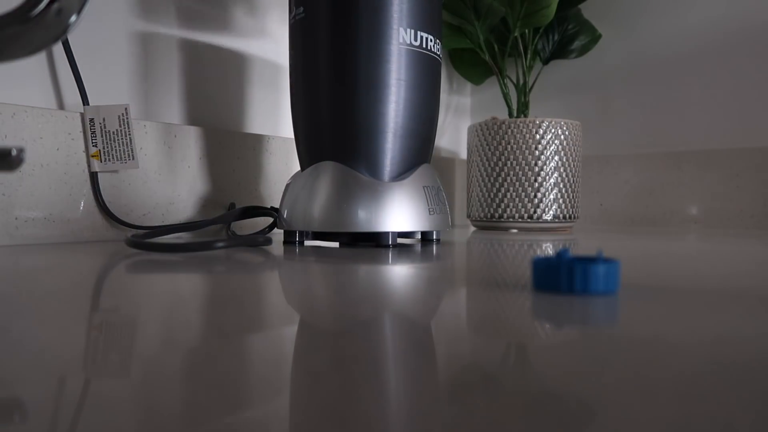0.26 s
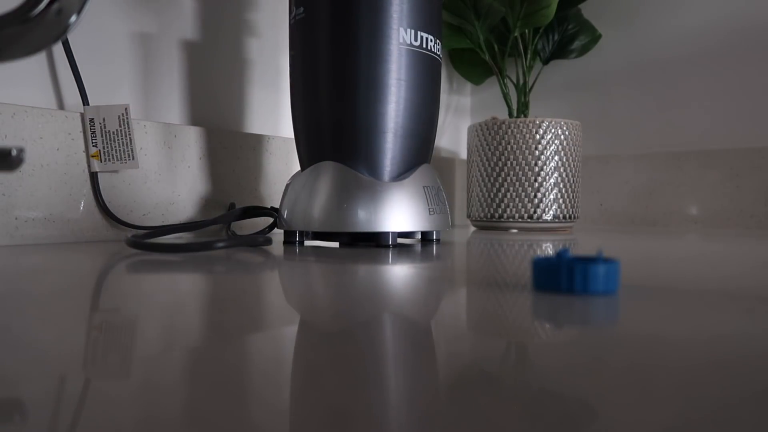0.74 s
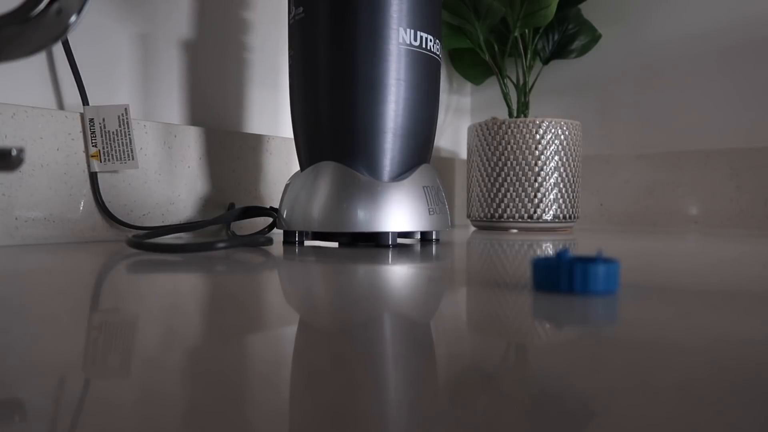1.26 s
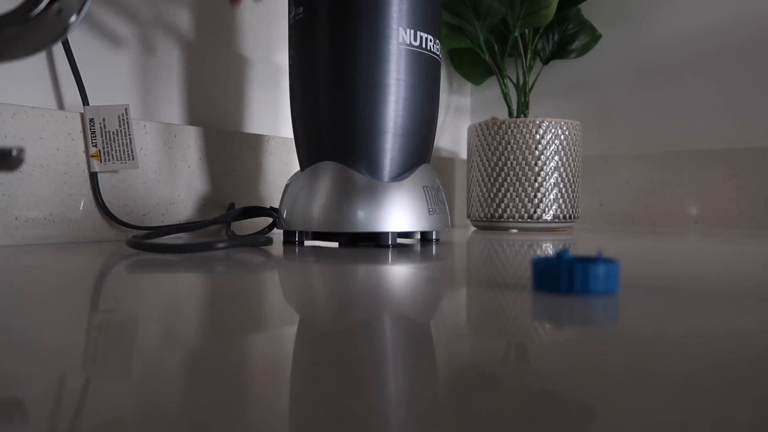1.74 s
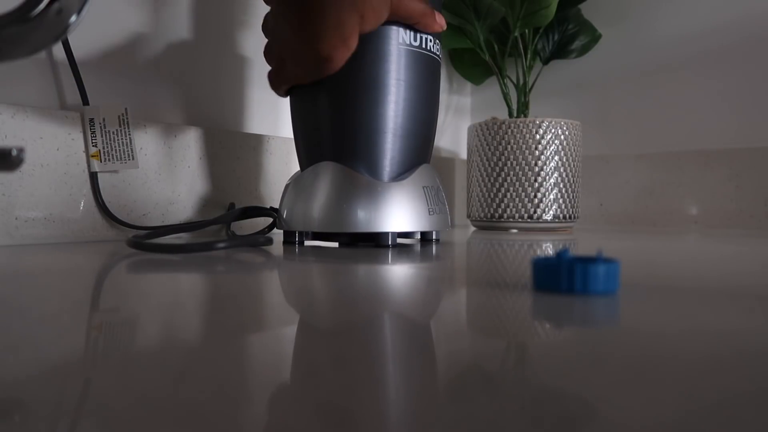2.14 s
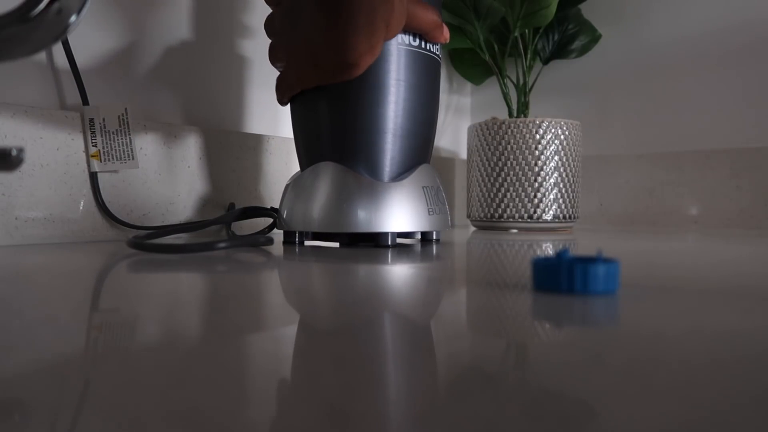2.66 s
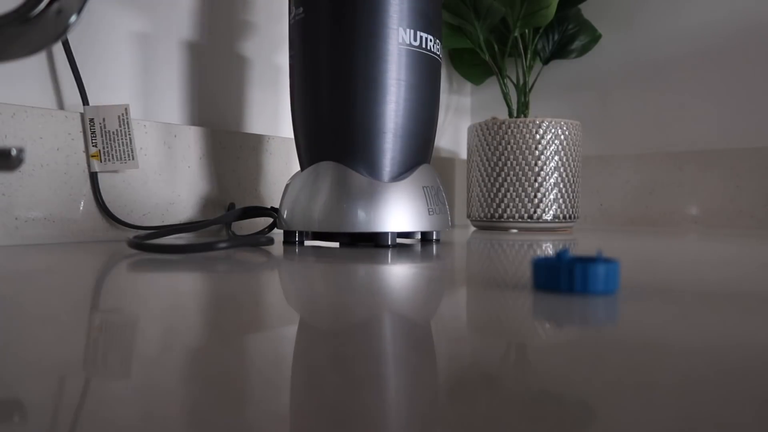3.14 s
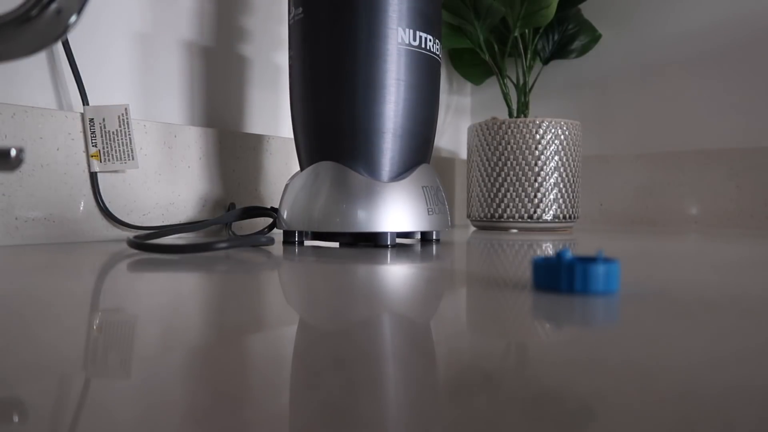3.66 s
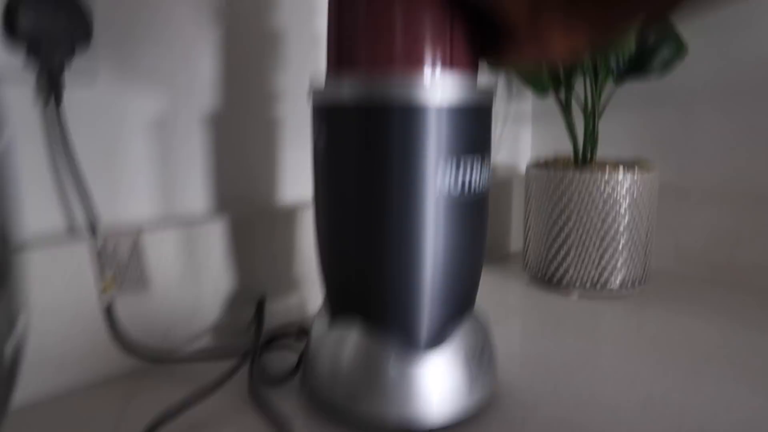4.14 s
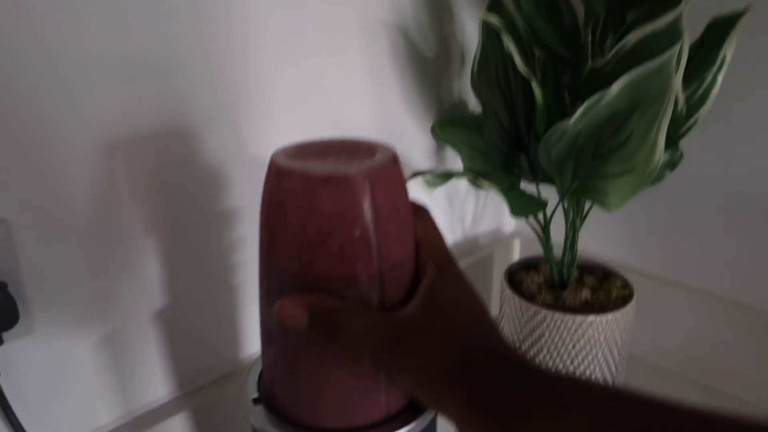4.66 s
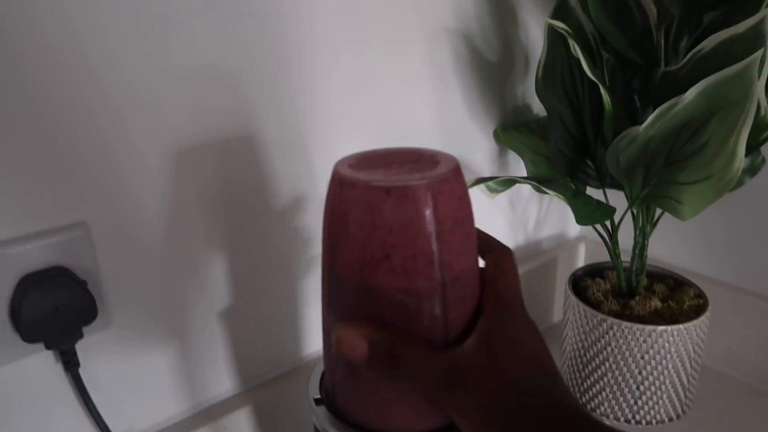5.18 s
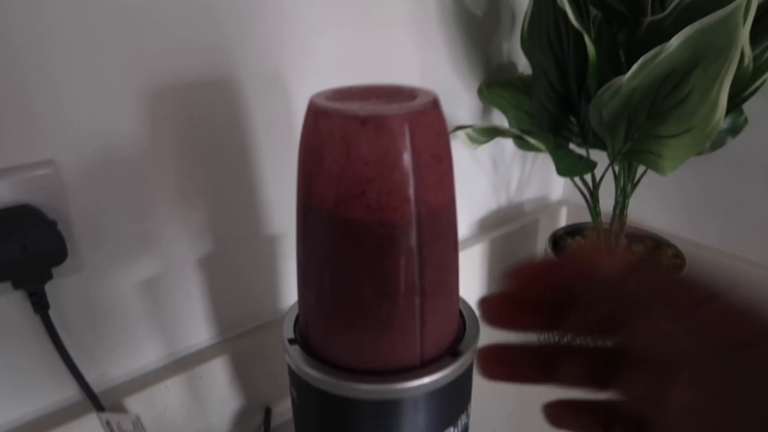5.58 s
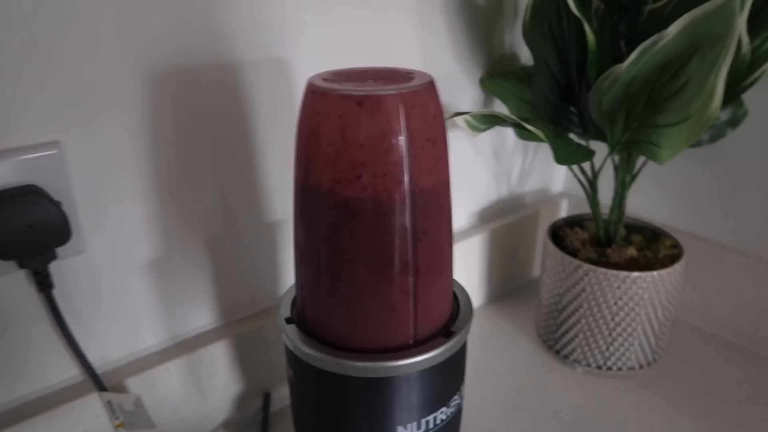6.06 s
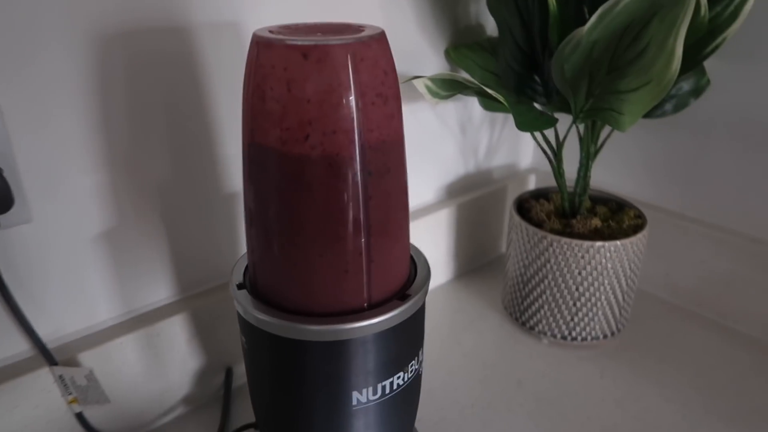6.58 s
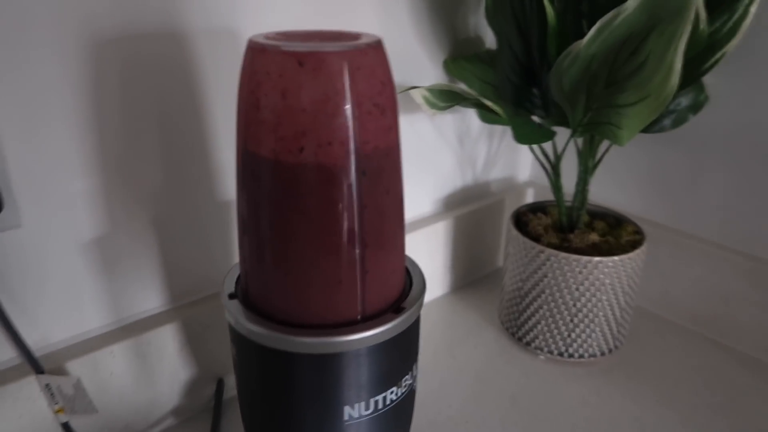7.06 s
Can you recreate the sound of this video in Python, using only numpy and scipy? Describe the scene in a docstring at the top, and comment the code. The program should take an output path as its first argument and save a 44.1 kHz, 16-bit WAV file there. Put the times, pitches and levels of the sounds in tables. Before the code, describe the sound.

A small kitchen is quiet, with soft low rumble and a barely audible high electric whine. At 0.4 seconds a full plastic cup knocks hollowly on a blender base, followed by lighter taps, rattles and rubs until 0.85. Firmer seating clunks come around 1.1 and again at 1.45, with short scrapes and slight room reverberation. Near-quiet follows, with a faint airy rub at 2.0 and small creaks to 2.3. At 2.4 a latch snaps, and at 2.45 the motor jerks on with a loud, slightly clipped crack. It spins up almost instantly into a roar; lumps thump until 2.8. Dense wet churning, hum and breathy high whistles continue. Between 3.8 and 4.3 the close microphone rises from counter to cup; bumps and gulps pass, low hum weakens and the color shifts. From about 6 the roar is steadier, running through the end at 7.3.

```python
"""In a small kitchen with low rumble and a thin whine, a cup of fruit knocks on a blender base and a counter:
impacts are decaying modes and noise, sliding plastic is modulated noise. A faint rub and a snapping latch follow.
Then the motor jerks into motion with a crack; shaft harmonics and mains hum underlie resonant noise of the
churning fruit, whose colour shifts, with gliding whistles, thumps and brief swells.
Halfway through, the listening point rises from the counter to the cup. Peaks are clipped."""
import sys
import numpy as np
from scipy import signal
from scipy.fft import rfft, irfft, next_fast_len
from scipy.io import wavfile
from scipy.ndimage import map_coordinates

SR = 44100
rng = np.random.default_rng(int(sys.argv[2]) if len(sys.argv) > 2 else 0)


def dump_mix(stems):
    """Bounce the given channels to the path in sys.argv[1] as a 16-bit WAV at rate SR."""
    frames = np.atleast_2d(stems).T  # one column per channel
    limited = np.clip(frames, -1, 1)  # hard clip at full scale
    pcm = np.round(limited * 32767).astype(np.int16)
    wavfile.write(sys.argv[1], SR, pcm)


N = 322371
TIME_S = np.arange(N) / SR


def amp(db):
    """Level law: 20 dB is a factor of ten in amplitude."""
    return 10 ** (np.asarray(db) / 20)


def unit(x):
    """Normalization by signal power: scale to rms 1."""
    return x / np.sqrt(np.mean(x ** 2) + 1e-20)


def along(points, hz):
    """Logarithmic frequency scale: interpolate (frequency, value) points along it."""
    point_hz, values = np.transpose(points)
    return np.interp(np.log(hz + 1), np.log(point_hz + 1), values)


def curves(rows):
    """Piecewise-linear control: one value per sample for each column after the time."""
    s, *columns = np.transpose(rows)
    return [np.interp(TIME_S, s, column) for column in columns]


def wobble(rate):
    """Band-limited fluctuation: a smooth random curve with rate knots a second."""
    knots = rng.standard_normal(int(N * rate / SR) + 4)
    return map_coordinates(knots, [np.arange(N) * rate / SR])


def bell(distance, width):
    """Gaussian selectivity: a peak of 1 with the given full width at half height."""
    return np.exp2(-(2 * distance / width) ** 2)


def filtered(x, response):
    """Linear filtering: multiply the spectrum by a response of frequency."""
    size = x.shape[-1]
    m = next_fast_len(size + SR // 2)
    return irfft(rfft(x, m) * response(np.fft.rfftfreq(m, 1 / SR)), m)[..., :size]


def noise(spectrum, size):
    """Spectral shaping: two unrelated coloured noises of rms 1."""
    return unit(filtered(rng.standard_normal((2, size)), lambda hz: amp(along(spectrum, hz))))


# stereo width of the sound field: (frequency [Hz], side gain [dB])
SIDE_GAIN = [(60, -55), (110, -19), (200, -19), (380, -14.5), (690, -25.5), (1280, -18), (2350, -18),
             (4340, -9.5), (8000, -1.5), (14700, 5.5)]


def spread(pair):
    """Interaural decorrelation: mid plus and minus side, nearly mono in the bass, wide in the treble."""
    side = filtered(pair[1], lambda hz: amp(along(SIDE_GAIN, hz)))
    return np.array([pair[0] + side, pair[0] - side])


def add(track, s, sound):
    """Superposition: mix a sound into a track at time s."""
    part = track[..., round(s * SR):][..., :sound.shape[-1]]
    part += sound[..., :part.shape[-1]]


# spectrum of the kitchen's rumble: (frequency [Hz], relative density [dB per Hz])
KITCHEN_RUMBLE = [(25, -23), (40, -4), (62, 5.5), (100, -1.5), (165, -5), (240, -7), (380, -4), (630, -16),
                  (1000, -20), (2000, -25), (4500, -32.5), (8000, -41.5), (13000, -52), (15000, -66)]


def background(floor_db=-45, whine_db=-74, whine_hz=13000):
    """Steady ambience: diffuse low-frequency noise with one pure high tone, a thin electric whine."""
    whine = amp(whine_db) * np.sin(2 * np.pi * whine_hz * TIME_S)
    return spread(amp(floor_db) * noise(KITCHEN_RUMBLE, N)) + whine


def ring(modes, t, attack, vary_db=3.0, detune=0.021):
    """Modal superposition: struck modes with peak 1; level and pitch differ a little at each blow."""
    chance = rng.standard_normal((len(modes), 2))
    x = np.zeros(len(t))
    for (hz, db, t60), (level_chance, pitch_chance) in zip(modes, chance):
        decay = amp(db + vary_db * level_chance - 60 * t / t60)
        x += decay * np.sin(2 * np.pi * hz * (1 + detune * pitch_chance) * t)
    x = x * (1 - np.exp(-t / attack))
    return x / np.abs(x).max()


SOFT_CYCLES = 0.55  # a mode loses 6 dB when the contact rise lasts this many of its cycles


def softened(modes, rise):
    """Impact spectrum: a slow contact hardly reaches the higher modes."""
    return [(hz, db - 20 * np.log10(1 + (hz * rise / SOFT_CYCLES) ** 2), t60) for hz, db, t60 in modes]


# contacts; levels precede the per-source offsets in knocks(): (time [s], cup level [dB],
# motor base level [dB], counter level [dB], click level [dB], rise [s])
CONTACTS = [(0.4202, -10.5, -20, -18, -15.5, 0.0003), (0.4247, -16.5, -30, -36, -26, .0004),
            (.43, -16.5, -20.5, -23, -26, 0.00067), (0.459, -30, -31, -43, -43, 0.0013),
            (.577, -26, -31, -19.5, -21.5, 0.005), (.619, -30, -45, -28.5, -42, 0.0012),
            (.645, -38, -42, -39, -38, .002), (0.747, -20.5, -27.5, -30, -27, 0.0007),
            (0.757, -24, -35, -23, -36, 0.0012), (0.845, -38, -44, -35, -49, 0.00095),
            (.964, -37, -39, -28, -38, 0.0018), (1.024, -40, -29, -29, -22.5, 0.0032),
            (1.052, -35.5, -35, -35, -24, .003), (1.0862, -34, -7.5, -18, -21.5, 0.0005),
            (1.102, -21.5, -9.5, -25, -19.5, 0.002), (1.112, -24, -26, -31, -32, .002),
            (1.139, -37, -11.5, -46, -40, .003), (1.357, -53, -42, -44, -36, .002),
            (1.4541, -24, -14.5, -21, -19, 0.002), (1.461, -17, -19, -16, -13.5, 0.00051),
            (1.4702, -22.5, -13, -19, -16, 0.00055), (1.608, -43.5, -61, -38, -30, 0.0009),
            (2.067, -45, -46, -38, -35, 0.002), (2.227, -34, -32.5, -31, -19, 0.006),
            (2.271, -42, -29.5, -36, -41, .004), (2.4474, -15, -3.5, -36.5, -33, 0.00076),
            (2.468, -35, -9, -38, -38, 0.0018)]
# modes of cup, motor base and counter: (frequency [Hz], relative level [dB], nominal 60 dB decay [s])
CUP_MODES = [(484.4, 6, 0.12), (527.6, 2, 0.19), (577, -8, 0.09), (696, 7.5, 0.06), (806, 9, 0.026),
             (922, 7, 0.031)]
BASE_MODES = [(201, -14, 0.065), (332, -12, 0.085), (365.3, 9.5, 0.092), (420, -4, 0.17)]
COUNTER_MODES = [(65.9, -4, 0.39), (78, -4.5, 0.29), (99, -3, 0.14), (121, -2.5, 0.12), (175, 1.5, 0.09)]
# spectrum of a plastic contact: (frequency [Hz], relative level [dB])
CLICK_SPECTRUM = [(200, -2), (700, 4.5), (1050, -4), (1400, 1.5), (2400, -3), (3800, -8), (7000, -22.5),
                  (11000, -34.5), (15000, -38)]
SEATED_AT_S = 1.2  # the cup drops into its seat
# speed of the ringing, both pitch and decay: base before seating, cup after it
LOOSE_BASE_RATIO, SEATED_CUP_RATIO = 0.93, 1.08


def knocks(cup_db=4, base_db=4, counter_db=2.0, click_db=-2, click_t60=0.032,
           rattle_db=-20, rattle_t60=0.17, grit_db=2.2):
    """Impact excitation: each contact clicks and rings the cup, the heavy base and the counter below."""
    out, t = np.zeros((2, N)), np.arange(SR // 2) / SR
    clicks, rattles = np.zeros((2, N)), np.zeros((2, N))
    for s, cup, base, counter, click, rise in CONTACTS:
        seated = s > SEATED_AT_S
        cup_ratio, base_ratio = (SEATED_CUP_RATIO, 1) if seated else (1, LOOSE_BASE_RATIO)
        cup_ring = ring(softened(CUP_MODES, rise), t * cup_ratio, attack=0.0011, vary_db=3.1, detune=0.011)
        base_ring = ring(BASE_MODES, t * base_ratio, attack=0.002, vary_db=1.6, detune=0.015)
        counter_ring = ring(COUNTER_MODES, t, attack=0.0044, detune=0.08)
        add(out, s, amp(cup + cup_db) * cup_ring)
        add(out, s, amp(base + base_db) * base_ring)
        add(out, s, amp(counter + counter_db) * counter_ring)
        # a hard crack, then the loose plastic parts rattle on
        contact = amp(click + click_db) * (1 - np.exp(-t / rise)) * noise(CLICK_SPECTRUM, len(t))
        add(clicks, s, amp(-60 * t / click_t60) * contact)
        add(rattles, s, amp(rattle_db - 60 * t / rattle_t60) * contact)
    grit = unit(amp(grit_db * wobble(400)))
    return out + spread(clicks + rattles * grit)


# reverberation of the kitchen: (frequency [Hz], 60 dB decay [s])
ROOM_DECAY = [(100, 0.35), (500, 0.4), (3000, 0.36), (12000, 0.2)]


def room(x):
    """Reverberation: convolution with noise whose decay depends on frequency, different at each ear."""
    hz, t, z = signal.stft(rng.standard_normal((2, SR // 2)), SR, nperseg=256)
    decay = amp(-60 * t / along(ROOM_DECAY, hz)[:, None])
    tail = signal.istft(z * decay, SR, nperseg=256)[1]
    tail = tail / np.linalg.norm(tail[0])
    late = np.pad(x.mean(axis=0), (SR // 200, 0))  # the tail lags by 5 ms
    return spread(signal.fftconvolve(late[None], tail, axes=1)[:, :N])


# the cup slides in its seat: (time [s], length [s], groan level [dB], scrape level [dB])
SLIDING_STROKES = [(0.578, 0.14, -35, -49.5), (0.643, 0.046, -38, -59), (0.81, 0.18, -43, -75),
                   (0.953, 0.08, -35.5, -51), (1.08, 0.11, -34, -40), (1.385, 0.047, -38, -41.5),
                   (2.075, 0.32, -48.5, -58), (2.283, 0.13, -40.5, -56)]


def slides(grain_db=3.0, grit_db=3):
    """Stick-slip friction: plastic rubs on plastic in short strokes and makes the cup groan."""
    groan = noise([(60, -31), (165, -1.0), (300, -5.5), (470, -3.5), (540, -5.5), (640, -11.0),
                   (900, -35), (2000, -64)], N)
    scrape = noise([(200, -25), (1000, 5.0), (2400, 1.0), (3300, -4.0), (4500, -5.5),
                    (8000, -19.0), (15000, -31)], N)
    scrape = unit(scrape * amp(grit_db * wobble(900)))
    out = np.zeros((2, N))
    for s, length, groan_db, scrape_db in SLIDING_STROKES:
        stroke = np.exp(-(2 * (TIME_S - s) / length) ** 2)
        out += stroke * (amp(groan_db) * groan + amp(scrape_db) * scrape)
    grain = unit(amp(grain_db * wobble(110)))
    return spread(out * grain)


RUB_AT_S, RUB_LENGTH_S, RUB_DB = 2, 0.15, -62
# resonances of the rub: (frequency [Hz], width [Hz], relative level [dB])
RUB_BANDS = [(2340, 110, -1), (4150, 120, -3), (4580, 120, -8)]


def rub():
    """Friction noise: a short airy swish in narrow bands, as of a hand reaching over the housing."""
    def bands(hz):
        return sum(amp(db) * bell(hz - centre, width) for centre, width, db in RUB_BANDS)

    swish = unit(filtered(rng.standard_normal((2, N)), bands))
    return spread(amp(RUB_DB) * bell(TIME_S - RUB_AT_S, RUB_LENGTH_S) * swish)


# snaps of the latch: (time [s], ring level [dB], snap level [dB])
LATCH_SNAPS = [(2.404, -35.5, -36), (2.409, -15.5, -30), (2.4122, -23, -23.5), (2.4387, -30, -22),
               (2.442, -29, -20)]
# modes of the switch: (frequency [Hz], relative level [dB], 60 dB decay [s])
SWITCH_MODES = [(1970, -1, 0.02), (4530, -1, 0.03), (4780, -7, 0.018), (6300, -3, 0.015),
                (7860, -11, 0.012)]


def latch(snap_t60=0.038):
    """Transient excitation: the cup's tabs snap the switch down with noise bursts and high, short modes."""
    out, t = np.zeros((2, N)), np.arange(SR // 10) / SR
    for s, ring_db, snap_db in LATCH_SNAPS:
        burst = noise([(300, 8), (5000, -4), (9000, -20), (15000, -26)], len(t))
        snap = amp(snap_db - 60 * t / snap_t60) * burst
        add(out, s, amp(ring_db) * ring(SWITCH_MODES, t, attack=0.00027, detune=0.032) + snap)
    return out


START_S = 2.447  # the motor is switched on
# the drive coupling takes up the load: (frequency [Hz], relative density [dB per Hz])
BITE_SPECTRUM = [(120, -25), (300, 5), (800, -2), (1130, -2), (1500, -8), (2000, -1), (2420, 1),
                 (2850, -10), (4100, -20), (6000, -46), (15000, -56)]


def bite(db=-4.0, crack_t60=0.023, grind_db=-13, grind_t60=0.14):
    """Two-stage decay: the first jerk slams the coupling into the blades, which grind into packed fruit."""
    out, t = np.zeros((2, N)), np.arange(SR // 4) / SR
    fade = amp(-60 * t / crack_t60) + amp(grind_db - 60 * t / grind_t60)
    add(out, START_S, amp(db) * fade * noise(BITE_SPECTRUM, len(t)))
    return spread(out)


def running(rise):
    """First-order rise: 0 before the motor starts, then up towards 1 with this time constant [s]."""
    return 1 - np.exp(-np.maximum(TIME_S - START_S, 0) / rise)


# shaft speed under load, before spin-up and jitter: (time [s], speed [turns a second])
SHAFT_SPEED = [(2.85, 170), (3.15, 165), (3.55, 165), (3.75, 160), (3.95, 165), (4.1, 150), (4.32, 180),
               (4.52, 162), (4.75, 167), (5.4, 170.8), (5.65, 169), (5.95, 182), (6.37, 183), (7.17, 166)]


def shaft_turns(spin_up=0.06, jitter=0.0039):
    """Phase accumulation: turns done so far, as the shaft spins up and then wavers."""
    speed, = curves(SHAFT_SPEED)
    return np.cumsum(speed * running(spin_up) * (1 + jitter * wobble(25))) / SR


LIFT_START_S, LIFT_TAKES_S = 3.8, 0.51


def lifted():
    """Source distance: 0 while one listens at the counter, 1 once level with the cup."""
    return np.clip((TIME_S - LIFT_START_S) / LIFT_TAKES_S, 0, 1)


MAINS_HZ = 50
# shaft harmonics: (multiple of the shaft rate, rms level [dB], share of random flutter [0 to 1])
SHAFT_ORDERS = [(1, -38.5, 0.22), (2, -33, 0.52), (3, -47, 0.8), (5, -38, 0.3)]


def motor(turns, hum_db=-39, overtone_db=-48, hum_lift_db=-10, overtone_lift_db=3, waver_db=4.5):
    """Order spectrum: unbalance and blades sound at shaft multiples; field coils hum at twice the mains."""
    out = np.zeros(N)
    for multiple, db, rough in SHAFT_ORDERS:
        flutter = np.sqrt(1 - rough) + np.sqrt(rough / 2) * (wobble(35) + 1j * wobble(35))
        out += amp(db) * np.real(flutter * np.exp(2j * np.pi * multiple * turns))
    field, lift = 2 * np.pi * 2 * MAINS_HZ * TIME_S, lifted()
    # the hum is strongest near the counter
    hum_level = hum_db + lift * (hum_lift_db + waver_db * wobble(3.7))
    overtone_level = overtone_db + lift * overtone_lift_db + waver_db * wobble(3.34)
    out += amp(hum_level) * np.sin(field)
    out += amp(overtone_level) * np.sin(2 * field)
    return np.sqrt(2) * out * running(0.064)


def causal(gain):
    """Minimum phase: fold the cepstrum so that the response rings only after it is struck."""
    cepstrum = irfft(np.log(gain + 1e-6))
    half = len(cepstrum) // 2
    fold = np.concatenate([[1], np.full(half - 1, 2), [1], np.zeros(half - 1)])
    return np.exp(rfft(cepstrum * fold))


# the mix against the cup wall: (frequency [Hz], relative density [dB per Hz])
CHURN_SPECTRUM = [(25, -30), (68, 0.5), (130, -12), (203, 2), (260, -3.5), (320, 4), (600, 7.5),
                  (780, -2.5), (1400, -3), (2800, -3), (4200, -8.5), (6000, -18), (9000, -31.5),
                  (12500, -40), (15000, -54)]


def chop(turns, resonances, chunk_rate, chunk_db, blade_depth, surge_db):
    """Source and filter: turbulence and chunks flung by the blades excite the cup's resonances."""
    chunks = (rng.random(N) < chunk_rate / SR) * rng.uniform(-1.04, 1, (2, N))
    force = rng.standard_normal((2, N)) + amp(chunk_db) * unit(chunks)
    blades = 1 + blade_depth * np.cos(2 * np.pi * 2 * turns)  # two pulses a turn
    force = force * blades * amp(surge_db * wobble(60))

    def wall(hz):
        peaks_db = sum(db * bell(hz - centre, width) for centre, width, db in resonances)
        return causal(amp(along(CHURN_SPECTRUM, hz) + peaks_db))

    return unit(filtered(force, wall))


def swirl(x, deep_db=0.5, treble_db=2.5, width_hz=55, rate=6, size=2048):
    """Time-varying resonance: the vortex reshapes the cup's air pocket, so bands come and go, least in the bass."""
    hz, t, z = signal.stft(x, SR, nperseg=size)
    grid = np.meshgrid(hz / width_hz, t * rate, indexing="ij")
    knots = rng.standard_normal((1024, 128))
    depth = along([(550, deep_db), (1400, treble_db)], hz)[:, None]
    gain = amp(depth * map_coordinates(knots, grid, mode="wrap"))
    return signal.istft(z * gain, SR, nperseg=size)[1][:, :N]


SURGES_PER_S = 14  # how fast the load on the blades changes


def load_gain(voice, surge, shared=0.14):
    """Amplitude modulation: a voice builds up, then surges with the load, partly in step with the others."""
    full_db, short_db, build_s, lift_db, surge_db = voice
    surging = np.sqrt(shared) * surge + np.sqrt(1 - shared) * wobble(SURGES_PER_S)
    built_db = full_db - short_db * (1 - running(build_s))
    return amp(built_db + lift_db * lifted() + surge_db * surging)


# colour of the churn: (time [s], position [0 early, 1 middle, 2 late colour])
CHURN_COLOUR = [(2.45, 0.014), (4.1, 0.53), (4.45, 1.01), (5.2, 0.91), (6, 1.97), (7.3, 1.98)]
# resonances in the early, middle and late colour: (frequency [Hz], width [Hz], boost [dB])
EARLY_RESONANCES = [(365, 78, 12), (469, 62, 8), (544, 20, 4.5), (1030, 170, 8.5), (1106, 68, 4.5),
                    (1840, 340, 7.5), (2420, 290, 3.5), (2803, 120, 4.5), (3140, 170, 5.5),
                    (4670, 280, 3.5)]
MIDDLE_RESONANCES = [(333, 63, 7.5), (467, 78, 11.5), (532, 22, 4), (760, 310, -1.5), (926, 50, 6.5),
                     (1044, 64, 12.5), (1159, 82, 9.5), (1680, 79, 7.5), (2050, 300, 3), (2800, 90, 5),
                     (3050, 230, 3), (4950, 400, 3)]
LATE_RESONANCES = [(332.5, 26.5, 13.1), (466, 57, 10), (542, 14, 2.3), (1048, 97, 9.1), (1158, 60, 9.8),
                   (1620, 130, 1.7), (2090, 200, 3.58), (3110, 150, 3.6), (3860, 270, 3.3),
                   (5000, 410, 2.6), (12000, 5000, 1.3)]
# four voices of the mix build up as the blades draw the fruit in, levels before piece gains: (full level [dB],
# initial deficit [dB], build-up [s], change at the raised listening point [dB], random surging [dB])
DEEP_VOICE = (-17.5, 3.5, 0.93, -1.85, .5)
DRONE_VOICE = (-22, 7, 0.51, -0.5, 0.66)
SPRAY_VOICE = (-20.5, 10, 0.44, -0.2, 0.34)
FIZZ_VOICE = (-40.5, 16, 0.34, 0, 0.84)
# big pieces hit the blades, also heard in thumps():
# (time [s], length [s], splash gain [dB], thump level on the base [dB])
BIG_PIECES = [(2.574, 0.014, 6.5, -13.5), (2.638, 0.025, 3.5, -18), (2.687, 0.065, 5, -8.5),
              (2.766, .045, 1, -15), (3.077, 0.032, -0.5, -25), (3.824, 0.02, 1, -20),
              (3.9, 0.01, -3, -11.5), (4.106, 0.025, 2.5, -9)]
PIECE_CHURN_SHARE = 0.62  # how much of the splash gain in dB reaches the deep churn


def blending(turns, low_hz=760, high_hz=1450, fizz_hz=6000, slap_db=1.5, slaps_per_s=150):
    """Band decomposition: churn of shifting colour, split into deep churn, drone, spray and fizz under load."""
    colour, = curves(CHURN_COLOUR)
    early = chop(turns, EARLY_RESONANCES, chunk_rate=350, chunk_db=-6, blade_depth=0.097, surge_db=0.44)
    middle = chop(turns, MIDDLE_RESONANCES, chunk_rate=800, chunk_db=-7.0, blade_depth=0.099, surge_db=1.1)
    late = chop(turns, LATE_RESONANCES, chunk_rate=1000, chunk_db=-8.5, blade_depth=0.041, surge_db=0.5)
    mix = np.zeros((2, N))
    for k, sound in enumerate([early, middle, late]):
        mix += np.sqrt(np.clip(1 - np.abs(colour - k), 0, 1)) * sound  # equal-power crossfade
    mix = swirl(mix)

    def below(edge):
        return filtered(mix, lambda hz: 1 / (1 + (hz / edge) ** 20))

    deep, lower, body = below(low_hz), below(high_hz), below(fizz_hz)
    surge = wobble(SURGES_PER_S)
    piece_db = sum(db * bell(TIME_S - s, length) for s, length, db, _ in BIG_PIECES)
    # fruit beats on the wall, less strongly in the later colours
    slaps = amp(slap_db * wobble(slaps_per_s) / (1 + np.abs(colour)))
    churn = load_gain(DEEP_VOICE, surge) * unit(deep * slaps)
    upper_voices = [(DRONE_VOICE, lower - deep), (SPRAY_VOICE, body - lower), (FIZZ_VOICE, mix - body)]
    splash = sum(load_gain(voice, surge) * unit(band) for voice, band in upper_voices)
    return spread(amp(PIECE_CHURN_SHARE * piece_db) * churn + amp(piece_db) * splash) * running(0.074)


# two breathy, gliding whistles of the cup: (time [s], frequency [Hz], level before start-up [dB])
LOW_WHISTLE_TRACK = [(2.53, 2900, -50.5), (2.6, 2930, -30), (3, 2880, -37), (3.4, 3060, -30),
                     (4.25, 3023, -47), (4.42, 3020, -32), (4.56, 3030, -25), (4.7, 3150, -34),
                     (5.25, 3190, -35), (6, 3140, -29), (6.75, 3110, -31.5), (7.3, 3130, -27.5)]
HIGH_WHISTLE_TRACK = [(2.56, 4670, -58), (2.7, 4740, -45), (2.92, 4780, -36), (3.08, 4900, -40),
                      (3.2, 5030, -37.5), (3.48, 5080, -34.5), (3.62, 5038, -41), (4.15, 5190, -37),
                      (4.5, 5130, -60)]


def whistle(track, width_hz, flutter_db):
    """Frequency shifting: a narrow band of rushing air glides along its track and flutters."""
    hz, db = curves(track)
    band_hz = SR / 8  # the band is made here, then shifted to the track
    band = filtered(rng.standard_normal((2, N)), lambda f: bell(f - band_hz, width_hz))
    analytic = signal.hilbert(band, next_fast_len(N))[:, :N]
    glide = np.real(analytic * np.exp(2j * np.pi * np.cumsum(hz - band_hz) / SR))
    return spread(amp(db) * unit(glide * amp(flutter_db * wobble(20)))) * running(0.05)


def thumps(attack=0.0064, damping=2.1):
    """Damped modal response: each big piece jolts the motor base; the pressing hand shortens the ring."""
    out, t = np.zeros(N), np.arange(SR // 4) / SR
    held = [(hz, db, t60 / damping) for hz, db, t60 in BASE_MODES]
    for s, length, _, db in BIG_PIECES:
        add(out, s - length / 4, amp(db) * ring(held, t, attack))
    return out


# one resonance swells as the mix shifts or a lump strikes the cup wall:
# (time [s], length [s], frequency [Hz], width [Hz], level [dB])
RESONANT_SWELLS = [(3.08, 0.049, 505, 110, -18), (3.195, 0.014, 1830, 199, -27),
                   (3.787, .025, 1810, 200, -23.5), (3.825, 0.037, 534, 99.6, -17.5),
                   (3.99, 0.029, 1800, 200, -29), (4.09, 0.023, 1790, 170, -23),
                   (4.209, 0.083, 1870, 169, -24), (4.248, 0.092, 1100, 120, -18.5),
                   (4.477, .025, 1810, 200, -23), (4.65, 0.077, 468.6, 70, -19),
                   (5.13, 0.11, 1156, 70, -28), (5.215, .06, 480, 89, -20.5), (5.46, 0.27, 502, 141, -22),
                   (5.95, .11, 470, 89.7, -19.5), (6.335, .06, 476, 90.2, -20)]


def swells():
    """Transient resonance: narrow noise bands swell briefly, low gulps of the vortex and higher knocks of lumps."""
    out, t = np.zeros(N), np.arange(SR) / SR - 0.5
    for s, length, centre, width, db in RESONANT_SWELLS:
        shape = bell(t, length)
        band = filtered(rng.standard_normal(SR), lambda hz: bell(hz - centre, width))
        add(out, s - 0.5, amp(db) * np.sqrt(np.mean(shape ** 2)) * unit(shape * band))
    return out


def scene():
    """Superposition of sources: handling noises with reverberation, then the running blender."""
    handling = knocks() + slides() + rub() + latch() + bite()
    reverberant = amp(-11.5) * room(handling)
    turns = shaft_turns()
    whistles = whistle(LOW_WHISTLE_TRACK, width_hz=190, flutter_db=1.4)
    whistles = whistles + whistle(HIGH_WHISTLE_TRACK, width_hz=420, flutter_db=4.5)
    blender = motor(turns) + blending(turns) + whistles + thumps() + swells()
    return background() + handling + reverberant + blender


TOP_HZ = 15200  # upper band limit


def record(dry):
    """Overload and band limitation: peaks are clipped, then a steep low-pass removes the highest treble."""
    return filtered(np.clip(dry, -0.97, 0.97), lambda hz: 1 / (1 + (hz / TOP_HZ) ** 120))


dry = scene()
out = record(dry)
dump_mix(out)
```